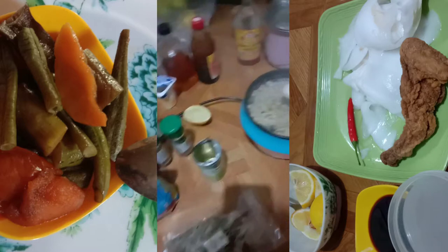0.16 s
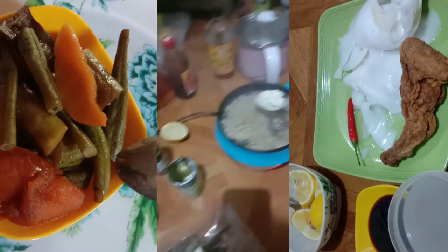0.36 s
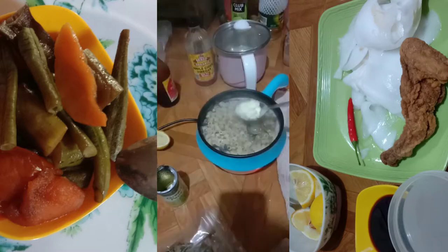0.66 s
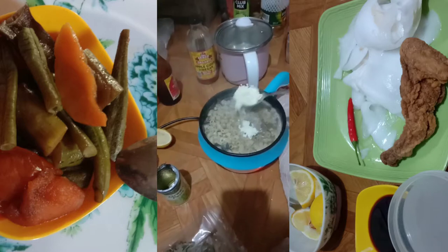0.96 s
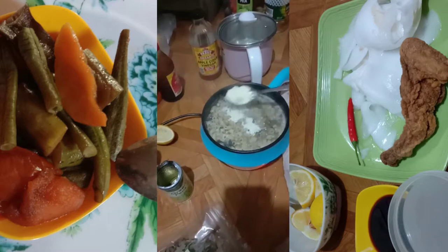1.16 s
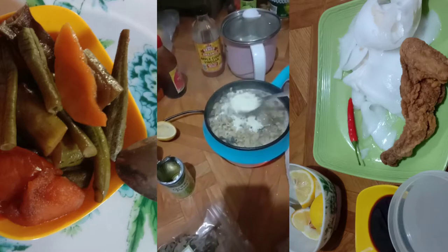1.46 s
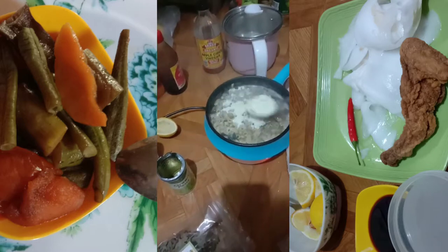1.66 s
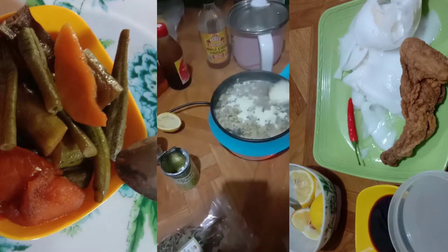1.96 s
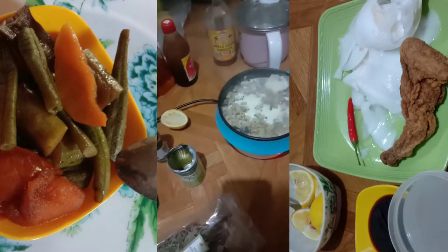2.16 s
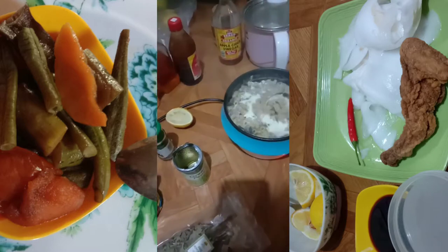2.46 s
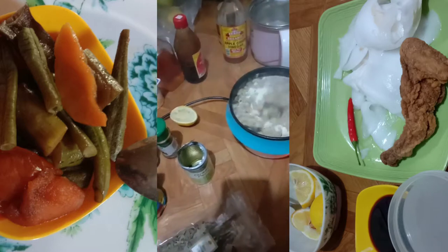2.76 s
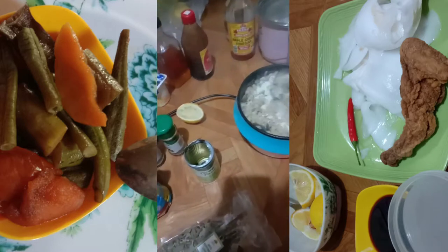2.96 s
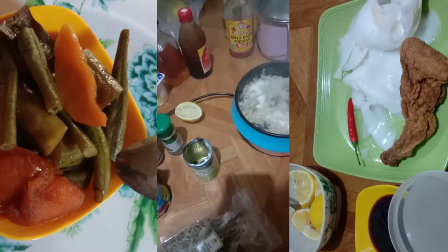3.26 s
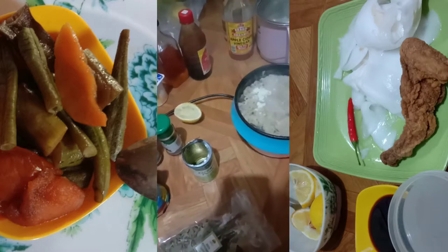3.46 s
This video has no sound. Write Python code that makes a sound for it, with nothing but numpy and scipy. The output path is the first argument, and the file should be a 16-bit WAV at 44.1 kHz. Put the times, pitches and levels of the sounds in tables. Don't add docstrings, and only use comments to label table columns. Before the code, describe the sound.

Close, dry phone pickup of a boiling pot: a brief steam swish at the start, continuous clustered bubble pops and fine spits, then two sharp spoon knocks, the second harder, while the bubbling continues.

```python
import sys
import numpy as np
from scipy import signal
from scipy.fft import rfft, irfft, next_fast_len
from scipy.io import wavfile
from scipy.ndimage import uniform_filter1d

SR = 44100
rng = np.random.default_rng(int(sys.argv[2]) if len(sys.argv) > 2 else 0)


def wav_record(signal):
    frames = np.transpose(np.atleast_2d(signal))
    bounded = np.clip(frames, -1, 1)
    quanta = np.round(bounded * 32767).astype(np.int16)
    wavfile.write(sys.argv[1], SR, quanta)


def elevation(decibels):
    levels = np.asarray(decibels, float)
    return 10 ** (levels / 20)


N = 158760

# pitch [Hz], width [Hz], level [dB].
POT_TONES = [(761, 166, -9), (1311, 64.5, 2.5), (1670, 150, -2), (2200, 142, -5), (3460, 404, -11.5)]


def unit(x):
    return x / np.sqrt(np.mean(x ** 2) + 1e-20)


def along(points, hz):
    f, v = np.transpose(points)
    return np.interp(np.log(hz + 1), np.log(f + 1), v)


def filtered(x, response):
    size = next_fast_len(N + SR // 2)
    hz = np.fft.rfftfreq(size, 1 / SR)
    return irfft(rfft(x, size) * response(hz), size)[..., :N]


def resonant(x, peaks, hollow=False):
    def response(f):
        total = 0
        for k, (center, width, db) in enumerate(peaks):
            sign = 1 if hollow else (-1) ** k
            total = total + sign * elevation(db) * 1j * f * width / (center * center - f * f + 1j * f * width)
        return total
    return filtered(x, response)


def follow(x, seconds):
    size = round(seconds * SR)
    return np.sqrt(np.abs(uniform_filter1d(x ** 2, size, origin=size // 3)))


def grains(s, db, hz, cycles, size, sudden=False):
    u = np.arange(size) / SR * hz[:, None] / cycles
    shape = 1.484 * (1 - np.exp(-6 * u)) if sudden else (np.e * u / 2) ** 2
    tone = np.sin(2 * np.pi * cycles * u * (1 + 0.0068 * u))
    wave = shape * np.exp(-u) * tone * elevation(db)[:, None]
    start = s - (not sudden) * cycles / hz
    at = np.round(start * SR).astype(int)[:, None] + np.arange(size)
    return np.bincount(at.clip(0, N).ravel(), wave.ravel(), N + 1)[:N]


def clusters(s, db, length, hz, spread, cycles, under_db, scatter_db, count, size, sudden=False):
    draw = rng.standard_normal((len(s), count, 3))
    k = np.arange(count)
    small = k > 0
    direction = np.where(k % 6 == 5, -.25, 1)
    late = direction * (0.0959 + np.abs(draw[..., 0])) * small
    level = db[:, None] - small * (under_db + scatter_db * np.abs(draw[..., 1])) - 3 * np.abs(late)
    pitch = np.reshape(hz, (-1, 1)) * np.exp(spread * np.tanh(draw[..., 2]) * small)
    times = s[:, None] + length * late
    return grains(times.ravel(), level.ravel(), pitch.ravel(), cycles, size, sudden)


def scattered(level, hz, spread, cycles, scatter_db, count, size=260):
    draw = rng.random((count, 3))
    s = draw[:, 0] * N / SR
    db = 20 * np.log10(level[(s * SR).astype(int)]) + scatter_db * draw[:, 1] ** 2
    pitch = hz * np.exp(spread * (2 * draw[:, 2] - 1))
    return grains(s, db, pitch, cycles, size)


def bed(level, peaks, rate, spiky_db, patchy_db):
    size = np.minimum(rng.exponential(size=N), np.pi)
    happens = rng.random(N) < rate / SR
    sparks = happens * elevation(spiky_db * size) * rng.standard_normal(N)
    z = signal.stft(unit(sparks) + 0.19 * rng.standard_normal(N), nperseg=256)[2]
    field = uniform_filter1d(rng.standard_normal(z.shape), 6, 0)
    field = uniform_filter1d(field, 6, 1)
    patched = signal.istft(z * elevation(patchy_db * np.tanh(unit(field))), nperseg=256)[1][:N]
    return level * unit(resonant(patched, peaks))


def still_air():
    # frequency [Hz], level [dB].
    air_color = [(60, 1), (300, -19.5), (7000, -20), (13500, -20), (14800, -11), (16000, -22.5)]
    noise = filtered(rng.standard_normal(N), lambda hz: elevation(along(air_color, hz)))
    return elevation(-78) * unit(noise)


def kitchen(x):
    t60 = 0.052
    t = np.arange(SR // 4) / SR
    tail = rng.standard_normal(len(t)) * elevation(-60 * t / t60) * (t > .002)
    return elevation(-8.5) * signal.fftconvolve(x, tail / np.linalg.norm(tail))[:N]


def spoon():
    # start [s], peak [dB], brightness [dB], time for the rattle to fade by 60 dB [s].
    knocks = [
        (2.7332, -9.5, -6.5, 0.2),
        (3.163, -5.5, -5, 0.18),
    ]
    # pitch [Hz], width [Hz], level [dB].
    edge_tones = [
        [(337, 87, -1.5), (634, 70, -9.5), (826, 110, -1), (1270, 220, -6.5), (1560, 190, -13),
         (2140, 340, -4.5), (3580, 1000, -12), (5400, 450, -16), (6800, 260, -18)],
        [(240, 116, -9.5), (360, 130, -4.5), (718, 240, -4.5), (1290, 300, -6.5), (1800, 165, -1),
         (2710, 250, -7.5), (3320, 700, -2.5), (5070, 530, -11.5), (7030, 650, -11.5)],
    ]
    # time [s], peak [dB].
    grazes = [
        (3.1491, -23.5),
        (3.153, -22),
    ]
    out = np.zeros(N)
    t = np.arange(SR // 6) / SR
    for (s, db, bright_db, t60), tones in zip(knocks, edge_tones):
        lumpy = elevation(1.7 * uniform_filter1d(rng.standard_normal(len(t)), size=120) * 12)
        strength = 0.5 * elevation(-60 * t / 0.016) + 0.061 * lumpy * elevation(-60 * t / t60)
        push = strength * rng.standard_normal(len(t))
        push[[4, 16, 60]] += -1.3, 3.4, -2.2
        push += elevation(bright_db) * np.diff(push, prepend=0)
        blow = np.pad(elevation(db + 4.5) * push, (round(s * SR), N))[:N]
        out += elevation(8) * resonant(blow, tones, hollow=True) + 0.52 * np.diff(blow, prepend=0)
    s, db = np.transpose(grazes)
    return out + grains(s, db, np.array([5900, 6200]), cycles=0.46, size=120)


def rumble(churn):
    # pitch [Hz], width [Hz], level [dB].
    deep_tones = [(84, 64, -4.5), (123.7, 47, 3), (208.5, 24, 2), (287, 78, 2)]
    # time [s], level [dB].
    heaving = [(0.0, -59), (0.08, -58.5), (3.6, -59)]
    heaving_db = np.interp(np.arange(N) / SR, *np.transpose(heaving))
    level = elevation(heaving_db + 2.0) + 0.1 * churn
    steady = 0.88 * bed(level, deep_tones, rate=3000, spiky_db=3.1, patchy_db=3.3)
    lumps = scattered(follow(steady / 0.88, 0.059), 240, 0.32, 0.83, 7, count=110, size=2000)
    return steady + 0.68 * lumps


def fizz(churn, crackle):
    # time [s], low bubbling [dB], high sizzle [dB].
    boil = [(0, -40, -52), (0.058, -57.5, -85), (.2, -44.5, -54.5), (.3, -60.5, -74), (0.449, -48.5, -62.5),
            (1.8, -49.5, -62.5), (2.3, -49, -59.5), (2.37, -61, -67), (2.85, -52.5, -53.5),
            (2.97, -70, -63.5), (3.12, -62.5, -62), (3.3, -55.5, -50), (3.6, -52, -61)]
    # pitch [Hz], width [Hz], level [dB].
    sizzle_tones = [(3280, 610, -10), (5285, 340, -4), (5930, 640, -9)]
    s, low_db, high_db = np.transpose(boil)
    t = np.arange(N) / SR
    swell = 0.22
    low = elevation(np.interp(t, s, low_db)) + swell * churn
    high = elevation(np.interp(t, s, high_db)) + swell * crackle
    out = 1.007 * bed(low, POT_TONES, rate=700, spiky_db=5.34, patchy_db=6.5)
    out += 0.99 * scattered(low, 1591, 0.39, 1.0, 13.5, count=600)
    out += 0.8 * bed(high, sizzle_tones, rate=1200, spiky_db=4.0, patchy_db=15)
    return out + 0.55 * scattered(high, 4500, 0.49, 1.64, 15.7, count=800)


def swish():
    # middle [s], spread [s], level [dB], then its tones as rows of pitch [Hz], width [Hz], level [dB].
    jet = (0.087, 0.025, -46, [(2660, 310, -1), (4100, 550, -6.5)])
    s, spread, db, tones = jet
    swell = np.exp(-((np.arange(N) / SR - s) / spread) ** 2)
    return elevation(db) * swell * unit(resonant(rng.standard_normal(N), tones))


def glugs():
    # time [s], peak [dB], pitch [Hz]. The rows at 2.737 and 3.161 s sound with the spoon knocks.
    low_tones = [(0.226, -47, 270), (0.344, -41, 260), (0.613, -45, 290), (0.716, -48, 176),
                 (1.016, -42.5, 270), (1.186, -48, 275), (1.499, -42, 287), (1.576, -40, 259),
                 (1.678, -38.5, 275), (2.532, -43.5, 226), (2.675, -44, 223), (2.737, -35.5, 317),
                 (3.161, -33, 380), (3.4, -43, 345), (3.461, -45, 214)]
    s, db, hz = np.transpose(low_tones)
    return grains(s, db, hz, cycles=0.85, size=2600)


def snaps():
    # time [s], peak [dB].
    tears = [(0.0689, -34), (0.1048, -31.5), (0.3422, -28), (0.411, -25.5), (0.5891, -32.5),
             (0.7477, -26.5), (0.893, -41), (1.1071, -33.5), (1.1463, -31.5), (1.231, -29.5),
             (1.325, -33.5), (1.4017, -33), (1.4302, -29.5), (1.9732, -38), (2.0424, -32.5), (2.1814, -28),
             (2.6171, -36), (3.314, -36), (3.3838, -29.5)]
    s, db = np.transpose(tears)
    return clusters(s, db, length=.018, hz=3330, spread=0.3, cycles=3.2,
                    under_db=8.1, scatter_db=6.2, count=18, size=200, sudden=True)


def spits():
    # time [s], peak [dB], pitch [Hz], spray against the spit [dB].
    spit_bursts = [(0.0163, -41.5, 4950, -29), (0.168, -27.5, 5900, -29), (0.2362, -37, 5840, -26),
                   (0.3406, -32, 4340, -37), (0.595, -46, 5400, -34), (0.7267, -31, 5950, -31),
                   (0.9542, -41, 5340, -22), (1.1368, -34, 5240, -33), (1.1514, -60, 5140, -32),
                   (1.3727, -41.5, 5360, -35), (1.437, -31, 5500, -29.5), (1.4642, -37.5, 5700, -41),
                   (1.5847, -30, 5530, -45), (1.6814, -39, 6300, -38), (1.8335, -33.5, 6050, -25.5),
                   (1.8711, -38.5, 5700, -40), (1.9744, -36, 4230, -19), (1.9951, -28.5, 5240, -24),
                   (2.053, -34, 4850, -28), (2.1304, -37.5, 5300, -32), (2.1786, -32.5, 4650, -34),
                   (2.2486, -31, 4900, -39), (2.5721, -40, 5150, -28), (2.6197, -33, 4800, -32),
                   (2.7634, -30, 5400, -22), (2.7811, -24.5, 6570, -34), (2.821, -38, 5400, -41),
                   (3.2565, -34, 5600, -21), (3.3136, -40, 4700, -28), (3.3433, -43, 5700, -29),
                   (3.3885, -28.5, 5040, -23), (3.4602, -25, 5760, -34), (3.5214, -38, 6490, -28)]
    s, db, hz, spray_db = np.transpose(spit_bursts)
    drops = clusters(s, db, length=0.011, hz=hz, spread=0.72, cycles=1.016,
                     under_db=5.4, scatter_db=12.0, count=14, size=120)
    spray = clusters(s, db + spray_db, length=0.016, hz=12300, spread=0.27, cycles=0.82,
                     under_db=1.9, scatter_db=3.6, count=24, size=40)
    return elevation(3.5) * drops, elevation(30.5) * spray


def pops():
    # time [s], peak [dB], pitch [Hz].
    steam_pockets = [(0.0704, -30.5, 2260), (0.0876, -31, 1800), (0.1355, -28, 1290), (0.163, -26.5, 1830),
                     (0.2226, -23.5, 1400), (0.246, -27.5, 1560), (0.2876, -51, 1390), (0.3296, -38, 1290),
                     (0.3383, -29.5, 1300), (0.3491, -35, 1290), (0.402, -25, 1490), (0.4206, -24.5, 1330),
                     (0.4623, -26.5, 1290), (0.526, -23, 1750), (0.5611, -26, 1770), (0.6145, -29.5, 1270),
                     (0.7043, -37, 1110), (0.7052, -26.5, 1330), (0.7172, -25, 1480), (0.7431, -32, 1170),
                     (0.7761, -32, 1110), (0.7894, -24.5, 1800), (0.831, -38, 1630), (0.8515, -34, 1170),
                     (0.8923, -33.5, 1660), (0.8985, -50, 1660), (0.9525, -43, 1370), (0.9584, -36.5, 1590),
                     (0.9907, -37, 1290), (1.0116, -28, 1230), (1.0497, -34.5, 1290), (1.1175, -31, 1280),
                     (1.19, -37, 1300), (1.2069, -26.5, 1550), (1.2534, -26, 1360), (1.2945, -38, 1280),
                     (1.2945, -28.5, 1300), (1.3234, -25, 1270), (1.3867, -29.5, 1650), (1.4013, -23, 1710),
                     (1.482, -46, 1270), (1.5053, -32, 1690), (1.5532, -30, 1910), (1.576, -32, 1610),
                   (1.6128, -41, 1240), (1.638, -35.5, 1630), (1.6787, -23.5, 1550), (1.7177, -42, 1710),
                   (1.7333, -37, 1270), (1.748, -27.5, 1760), (1.826, -33, 1150), (1.8544, -52, 1260),
                   (1.8833, -47, 1320), (1.8908, -29.5, 1270), (1.9275, -28.5, 1640), (1.9925, -33, 1290),
                   (2.0073, -29, 1320), (2.065, -30, 1310), (2.1787, -36, 1270), (2.1892, -28, 1650),
                   (2.2226, -31.5, 1280), (2.3099, -31.5, 1310), (2.424, -35.5, 1550),
                   (2.5259, -41.5, 1280), (2.549, -36, 1580), (2.577, -34, 1540), (2.6687, -32, 1290),
                     (2.7474, -24.5, 1210), (2.7634, -25.5, 1330), (2.7754, -34, 1280), (2.7954, -61, 1350),
                 (2.8569, -32.5, 1610), (3.0604, -45, 1290), (3.1774, -24, 2370), (3.1944, -30, 2000),
                 (3.2186, -30.5, 1760), (3.2484, -31, 1290), (3.2959, -32, 1700), (3.3892, -31, 1560),
                 (3.4032, -26.5, 1230), (3.4535, -28.5, 1290)]
    s, db, hz = np.transpose(steam_pockets)
    bursts = elevation(2) * clusters(s, db, length=0.016, hz=hz, spread=0.22, cycles=1.59,
                               under_db=12, scatter_db=1.67, count=8, size=260, sudden=True)
    return 0.84 * bursts + 0.71 * resonant(bursts, POT_TONES)


def boiling():
    popping = pops()
    spitting, spray = spits()
    snapping = snaps()
    churn = follow(popping, 0.017)
    crackle = follow(spitting + snapping, 0.019)
    bursts = popping + spitting + spray + snapping + glugs()
    return bursts + fizz(churn, crackle) + rumble(churn)


def microphone(x):
    # frequency [Hz], level [dB].
    mic_color = [(30, -10), (90, 2), (6900, -1.5), (7900, -21.5), (13500, -37), (14900, -19), (15700, -61),
                 (16300, -73)]
    # center [Hz], width [Hz].
    table_dips = [(450, 18), (580, 35), (990, 54), (2930, 22), (4350, 460)]

    def response(hz):
        dips = [1 - 0.37 / (1 + ((hz - center) / width) ** 2) for center, width in table_dips]
        return elevation(along(mic_color, hz)) * np.prod(dips, axis=0)
    return filtered(x, response)


def two_ports(mid):
    # frequency [Hz], level [dB].
    hiss_color = [(6000, -5.5), (8000, -11), (15400, -9), (15800, -36)]
    hiss = unit(filtered(rng.standard_normal(N), lambda hz: elevation(along(hiss_color, hz))))
    leak = filtered(np.roll(mid, 40), lambda hz: np.minimum(1 + (hz / 5000) ** 4, 12))
    side = elevation(-80.5) * hiss + elevation(-34) * leak
    return filtered(np.array([mid + side, mid - side]), lambda hz: 1 / (1 + (hz / 15750) ** 200))


def scene():
    near = boiling() + spoon() + swish()
    mid = microphone(near + kitchen(near)) + still_air()
    return two_ports(mid)


def top_cut(x):
    return signal.sosfilt(signal.butter(12, 16450, fs=SR, output="sos"), x)


def record(dry):
    return top_cut(dry)


dry = scene()
out = record(dry)
wav_record(out)
```